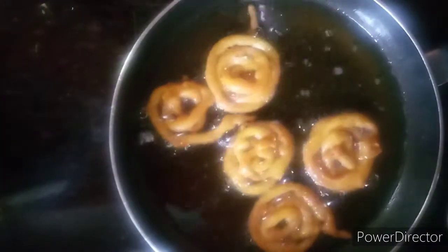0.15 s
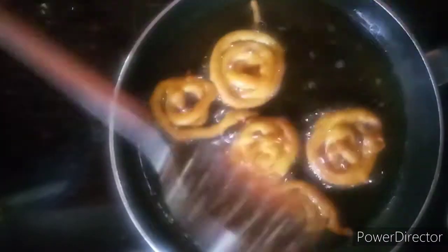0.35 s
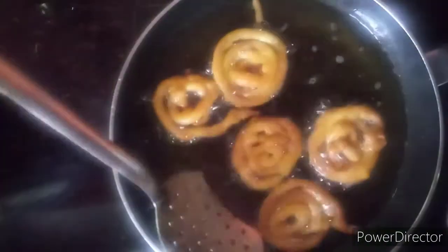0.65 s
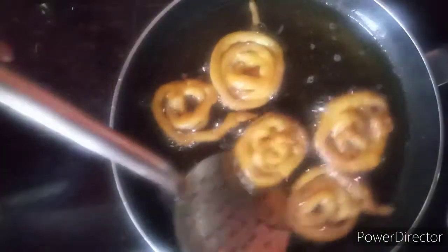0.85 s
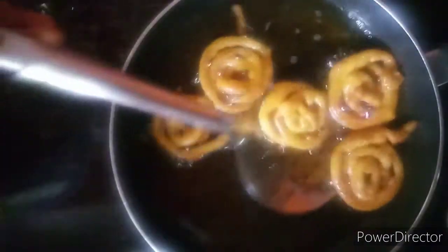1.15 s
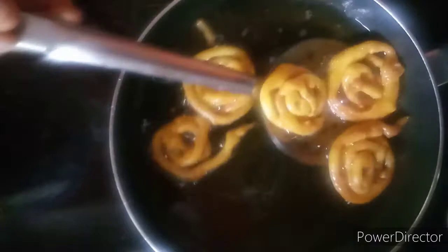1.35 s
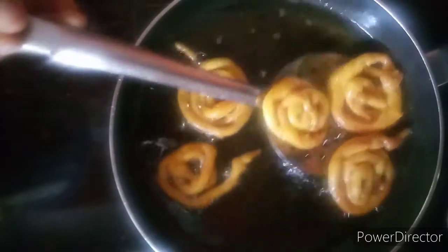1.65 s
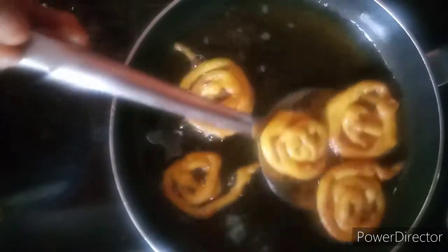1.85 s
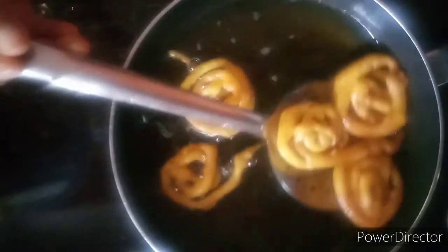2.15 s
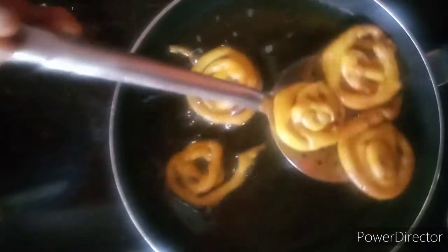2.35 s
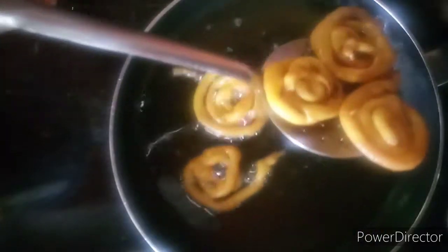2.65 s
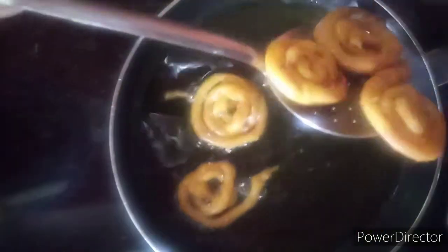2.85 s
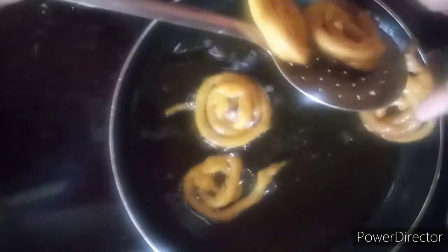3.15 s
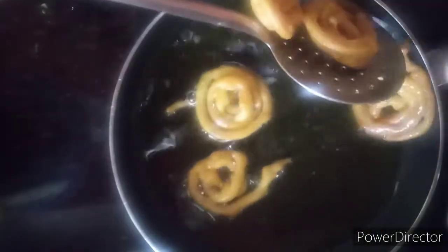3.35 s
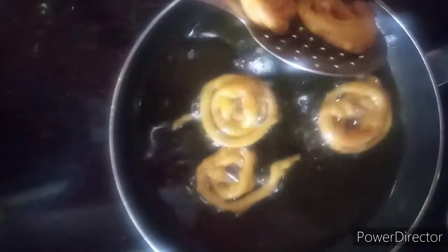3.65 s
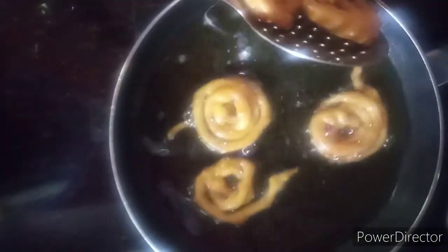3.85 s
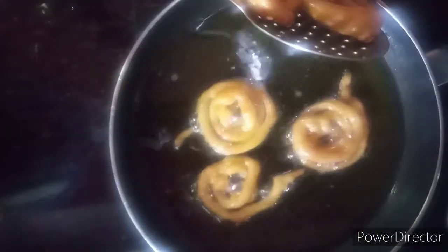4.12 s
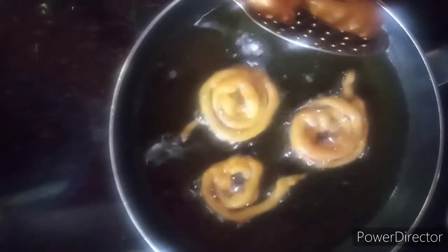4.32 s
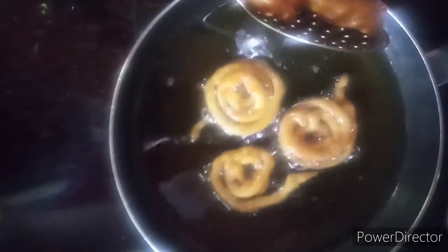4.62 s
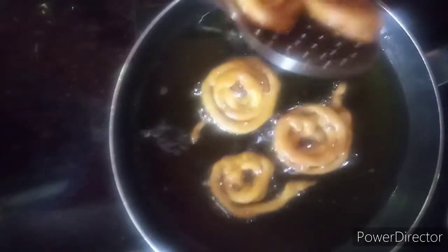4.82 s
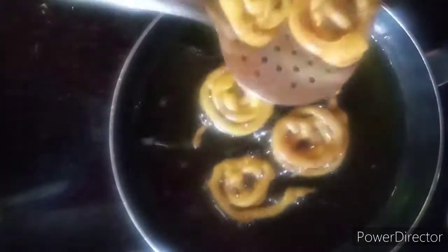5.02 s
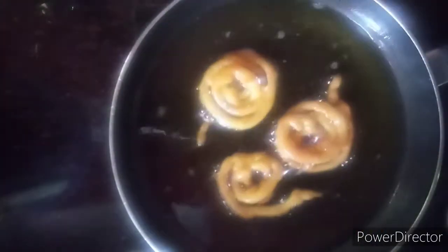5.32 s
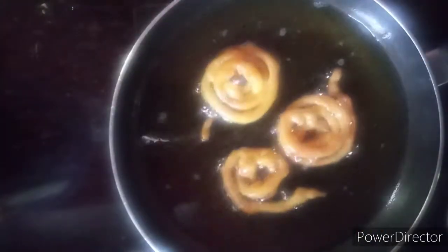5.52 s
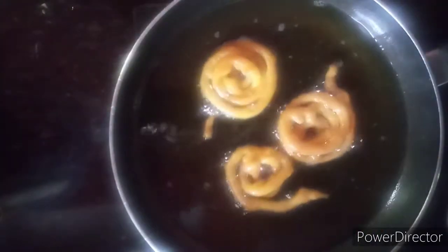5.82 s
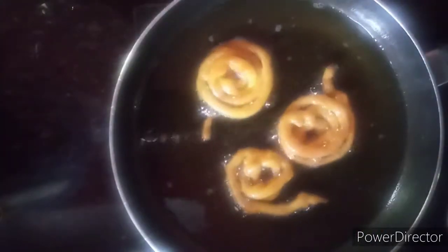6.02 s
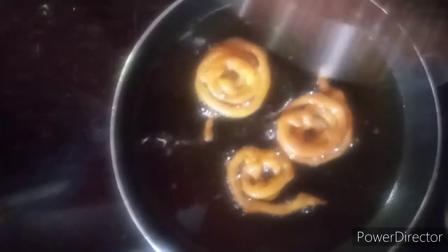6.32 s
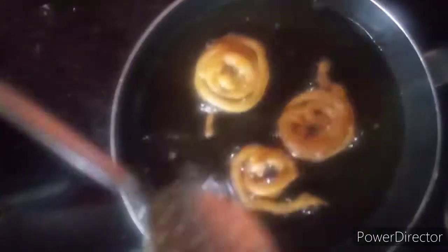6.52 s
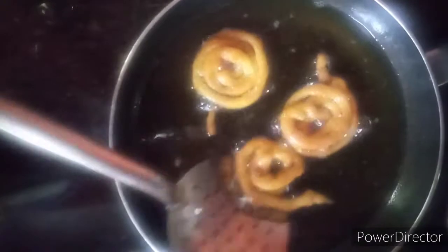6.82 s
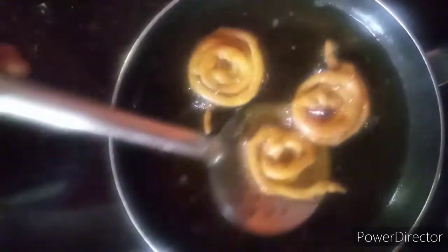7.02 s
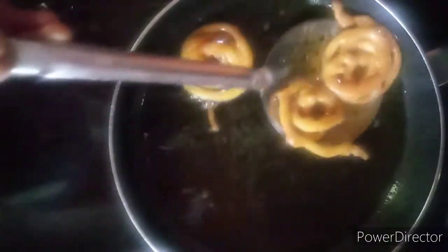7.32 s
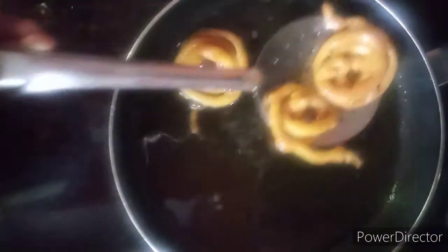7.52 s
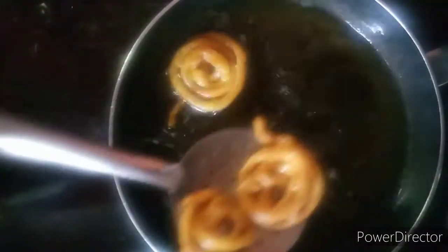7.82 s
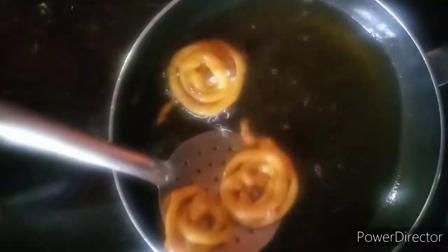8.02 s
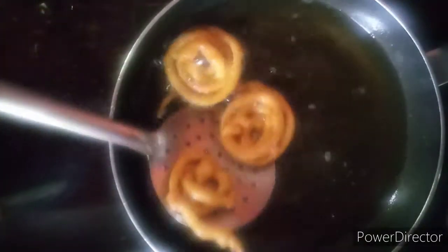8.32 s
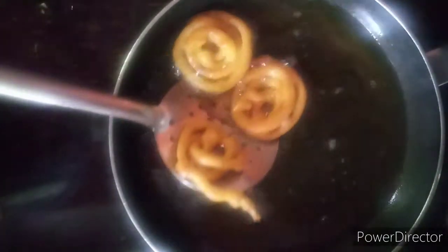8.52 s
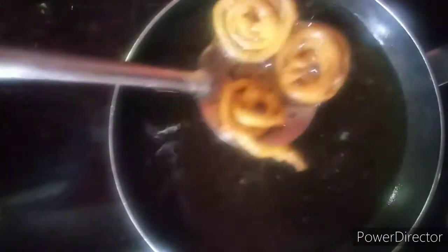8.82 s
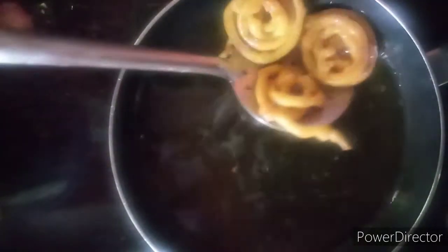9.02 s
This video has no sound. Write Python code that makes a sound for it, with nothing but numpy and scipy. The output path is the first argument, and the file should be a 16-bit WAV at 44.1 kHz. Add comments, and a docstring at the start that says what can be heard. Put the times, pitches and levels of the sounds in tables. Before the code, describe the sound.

A metal skimmer knocks and scrapes in a pan of quietly sizzling oil and clatters once against a metal dish.

```python
"""Frying batter, close to the stove

Batter spirals sizzle quietly in oil as tiny steam bubbles burst, in a small hard-walled kitchen.
Near the microphone a steel skimmer knocks against the oil-damped pan and drags over its bottom.
Past halfway it is unloaded beside the stove: it judders over a metal dish, which clatters, and then
returns to the pan. Underneath lie the flutter of the burner, a mains hum and a faint hiss."""
import sys
import numpy as np
from scipy import signal
from scipy.fft import rfft, irfft, next_fast_len
from scipy.io import wavfile

SR = 44100
rng = np.random.default_rng(int(sys.argv[2]) if len(sys.argv) > 2 else 0)


def inscribe(sig):
    """Save sig as 16-bit PCM at rate SR to the path in sys.argv[1].

    A 1-D sig is mono; a 2-D sig holds one channel per row.
    Samples are clipped to [-1, 1] before scaling.
    """
    pcm = np.round(np.clip(np.atleast_2d(sig).T, -1, 1) * 32767)
    wavfile.write(sys.argv[1], SR, pcm.astype(np.int16))


N = 403956
TIME = np.arange(N) / SR
RING_TIME = TIME[:SR]

# skimmer on pan: (time [s], level [dB], thump, ring, tick [dB re level], rocking pitch [Hz])
KNOCKS = [(0.712, -30.5, -17.5, -19, -38, 300), (2.211, -40.5, -19, -13, -31, 514),
          (3.168, -30.5, -9.5, -14.5, -20, 303), (3.39, -39.5, -15, -17, -28, 290),
          (3.613, -36, -16.5, -11, -45, 295), (5.063, -37.5, -12.5, -8, -32, 310),
          (5.103, -45, -17, -20, -20, 310), (6.779, -30, -13.5, -13.5, -30, 293),
          (6.86, -37.5, -13, -15.5, -38, 284), (7.842, -34, -6.5, -5.5, -17.5, 443),
          (8.149, -28.5, -16.5, -15, -35, 285), (8.273, -26, -16, -17, -37, 306),
          (8.519, -36, -21, -14.5, -43, 452), (8.959, -39.5, -20, -13, -28.5, 446),
          (9.016, -40, -16, -10.5, -35, 437)]
# resonances of the oiled pan: (frequency [Hz], level [dB], t60 [s])
PAN_MODES = [(296.2, -5, 0.3), (368, 0.5, 0.14), (470, -8.5, 0.15), (609, 1.5, 0.14), (703, -4.5, 0.16),
             (856, 0, 0.13), (962, 8, 0.037), (1060, -2.5, 0.15), (1433, -10.5, 0.2), (1765, -23, 0.27),
             (2070, -10, 0.12), (2320, -8, 0.091), (2724, -15, 0.12), (2630, -41, 0.2), (2860, -24, 0.28)]
# the crowd of quickly damped modes between them: (frequency [Hz], level [dB])
PAN_WASH = [(150, -6.5), (300, -10), (600, 3.5), (1050, 4.5), (1300, -8), (1650, -11), (2100, -6),
            (2750, -7), (3100, -14.5), (3600, -25), (4800, -16.5), (8000, -22.5), (10000, -24),
            (15000, -23)]
# the pan's thump, clank, ring and tick registers: (low edge [Hz], high edge [Hz], level [dB])
PAN_REGISTERS = [(168, 514, -10), (573, 1990, -17.5), (1533, 3000, -8), (3920, 9200, -10.5)]


def pan_knocks():
    """The skimmer strikes the pan, and its springy handle drops it back once, softly."""
    # change on the rebound: (level [dB], thump [dB], ring [dB], tick [dB])
    rebound_db = [-15, -4, -5, -4]
    hits = rebounding(KNOCKS, rebound_db, delay_s=0.022)
    return blows(hits, struck_pan, rock_db=-7.5, rock_t60=0.093, rock_rise_s=0.0017)


def struck_pan():
    """Oil damps most of the pan's modes within a few hundredths of a second."""
    return touch(PAN_MODES, PAN_WASH, PAN_REGISTERS,
                 wash_db=8.5, wash_t60=0.046, uneven_db=2.5, contact_s=0.00048, crack_db=-5.5)


def pan_nudges():
    """The skimmer pushes the pan softly, cushioned by oil and batter."""
    # (time [s], level [dB], thump [dB re level])
    nudges = [(1.257, -48, -19), (1.569, -54, 1.5), (1.64, -51, -2.5), (2.273, -46.5, -10.5),
              (2.839, -52.5, -3), (3.135, -40.5, -15), (3.349, -39.5, -6), (5.078, -43.5, -10),
              (6.957, -46, -17), (7.491, -46.5, -5), (7.688, -57, -1.5), (8.128, -45, -22),
              (8.254, -47, -16)]
    ring_db, tick_db, rock_hz = -13, -25, 294.5
    pushes = [(*row, ring_db, tick_db, rock_hz) for row in nudges]
    return blows(pushes, nudged_pan, rock_db=-6.5, rock_t60=0.099, rock_rise_s=0.0075)


def nudged_pan():
    """A cushioned push swells slowly and rubs on for a moment."""
    return touch(PAN_MODES, PAN_WASH, PAN_REGISTERS,
                 wash_db=1.5, wash_t60=0.16, uneven_db=0, contact_s=0.0056, crack_db=-15)


def dish_clatter():
    """The skimmer lands on the dish, bounces, and judders on its handle in even, glancing touches."""
    # landings: (time [s], level [dB], thump, ring, tick [dB re level])
    clanks = [(0.075, -44, -5, -6.5, -46), (5.748, -23.5, -17, -13, -23.5), (5.797, -27, -14, -8.5, -31),
              (5.959, -30, -13.5, -15, -27), (6.005, -23, -8.5, -6, -29.5), (6.024, -22, -4, -3.5, -28.5),
              (6.113, -34.5, -3, -3, -26), (6.162, -42.5, 0.5, -1.5, -25)]
    # change on the dry dish's quick, hard rebound: (level [dB], thump [dB], ring [dB], tick [dB])
    rebound_db = [-7, -7, 6, -7]
    # runs of touches: (time [s], length [s], first level [dB], slope [dB/s])
    judders = [(0.001, 0.13, -42, 11), (5.773, 0.115, -19.5, -150), (5.97, 0.04, -20.5, -16)]
    # colour of a glancing touch: (thump, ring, tick [dB re level])
    glance_db = [-19, -15.5, -40]
    rock_hz, judder_gap_s = 726, 0.0245
    landings = rebounding([(*row, rock_hz) for row in clanks], rebound_db, delay_s=0.0076)
    glances = [(s + t, db + db_per_s * t, *glance_db, rock_hz)
               for s, length_s, db, db_per_s in judders for t in np.arange(0, length_s, judder_gap_s)]
    return blows([*landings, *glances], struck_dish, rock_db=-11.5, rock_t60=0.043, rock_rise_s=0.0019)


def struck_dish():
    """The dry metal dish rings more freely than the pan."""
    # resonances: (frequency [Hz], level [dB], t60 [s])
    modes = [(428.5, -24, 0.23), (588.5, -5.5, 0.35), (648, -4, 0.5), (717, -13, 0.35), (831, -12.5, 0.65),
             (950, -21, .4), (1050, -10, 0.2), (1155, 15.5, 0.061), (1200, 11.5, 0.074), (1259, 6, 0.28),
             (1273, -11, 0.46), (2350, -1, 0.18), (2320, -1, 0.13), (2342, -15, 0.14), (2750, -5.5, 0.13),
             (3150, -19, 0.083), (3560, -19, 0.15)]
    # quickly damped modes between them: (frequency [Hz], level [dB])
    wash = [(200, -6.5), (420, -1), (750, 6), (1250, 1.5), (1500, -10), (1900, -11.5), (2400, 0),
            (3200, -9), (3800, -21.5), (5000, -7.5), (8300, -7), (9500, -15), (15000, -16)]
    # thump, clank, ring and tick: (low edge [Hz], high edge [Hz], level [dB])
    registers = [(258, 994, -9.5), (954, 1540, -16.5), (1445, 3460, -9.5), (4100, 14300, -11)]
    return touch(modes, wash, registers,
                 wash_db=4, wash_t60=0.074, uneven_db=-0.6, contact_s=0.001, crack_db=-10)


def touch(modes, wash, registers, wash_db, wash_t60, uneven_db, contact_s, crack_db):
    """One touch on a metal vessel, split into registers; each contact point weights the modes anew."""
    weights = from_db(uneven_db * rng.standard_normal(len(modes))) * rng.choice([-1, 1], len(modes))
    tones = sum(w * from_db(db) * mode(hz, t60) for w, (hz, db, t60) in zip(weights, modes))
    crowd = coloured(rng.standard_normal(SR), wash) * dying(wash_t60)
    body = (unit_attack(tones) + from_db(wash_db) * unit_attack(crowd)) * rising(contact_s)
    # steel meeting steel gives off a dry, bright crack before the body takes over
    crack = band(coloured(rng.standard_normal(SR), wash), low_hz=4100, high_hz=14900) * dying(t60=0.015)
    whole = unit_attack(body) + from_db(crack_db) * unit_attack(crack)
    return np.array([from_db(db) * unit_attack(band(whole, low, high)) for low, high, db in registers])


def blows(rows, vessel, rock_db, rock_t60, rock_rise_s):
    """Each blow rings the vessel and rocks it on its support."""
    out = np.zeros(N)
    for s, level_db, thump_db, ring_db, tick_db, rock_hz in rows:
        body = from_db([thump_db, 0, ring_db, tick_db]) @ vessel()
        rock = from_db(thump_db + rock_db) * unit_attack(mode(rock_hz, rock_t60) * rising(rock_rise_s))
        add(out, s, from_db(level_db) * (body + rock))
    return out


def rebounding(rows, change_db, delay_s):
    """Every blow, and the weaker one that follows it."""
    return np.vstack([rows, np.array(rows) + [delay_s, *change_db, 0]])


def skimmer_tings():
    """Edge-on hits set the skimmer itself ringing; the point of contact picks which modes speak."""
    # (time [s], level [dB], most excited frequency [Hz], spread [octaves])
    hits = [(0.713, -58.5, 1820, 0.2), (3.169, -43, 1063, 0.2), (3.391, -54, 1063, 0.2),
            (5.064, -52.5, 2560, 0.2), (5.103, -61, 6500, 0.06), (5.746, -50, 7400, 0.33),
            (6.023, -29, 3760, 0.41), (6.781, -46, 3600, 0.75)]
    # disc and handle: (frequency [Hz], level [dB], t60 [s])
    modes = [(1062, 2.5, 0.13), (1827, -0.5, 0.34), (2550, 1, 0.18), (3430, -19, 0.11), (4430, -22.5, 0.14),
             (5660, -6.5, 0.073), (6180, -7, 0.11), (6330, -2.5, 0.13), (7260, -5.5, 0.12),
             (8200, 3, 0.033)]
    out = np.zeros(N)
    for s, level_db, centre_hz, octaves in hits:
        for hz, db, t60 in modes:
            share = np.exp(-(np.log2(hz / centre_hz) / octaves) ** 2)
            add(out, s, share * from_db(level_db + db) * mode(hz, t60))
    return out


def pan_drags():
    """A light stroke slides dully on the oil; a firm one bites the metal and grates."""
    # strokes over the pan bottom: (time [s], length [s], final pressure [dB])
    drags = [(0.829, 0.16, -58), (1.27, 0.081, -59.5), (1.881, 0.22, -62.5), (7.313, 0.086, -60),
             (8.373, 0.185, -50.5), (8.705, 0.261, -51)]
    # what a firm and a light stroke excite most: (frequency [Hz], level [dB], t60 [s])
    grate_modes = [(297, -10, 0.12), (449.4, -10.5, 0.15), (598, -22, 0.096), (710, -9, 0.15),
                   (974, 5.5, 0.032), (1068, 2, 0.066), (1373, -14, 0.053), (2490, -13, 0.16),
                   (2630, -11, 0.067)]
    slide_modes = [(347, -4, 0.056), (484, -3.5, 0.059), (635, -4.5, 0.13), (895, -10, 0.039),
                   (1012, -12.5, 0.067)]
    # their colours: (thump [dB], clank [dB], ring [dB], tick [dB])
    grate_db = [-9, 6.5, -14, -26.5]
    slide_db = [-2.5, 5.5, -3.5, -34]
    bite_db = -49.5   # pressure at which the rim breaks through the oil film
    pressure = sum(stroke(*row) for row in drags)
    bite = np.clip(pressure / from_db(bite_db), 0, 1)
    grate = rubbing(pressure * bite, grate_modes, grate_db)
    slide = rubbing(pressure * np.sqrt(1 - bite ** 2), slide_modes, slide_db)
    return grate + from_db(-6.5) * slide


def rubbing(force, modes, colour_db):
    """Hundreds of tiny catches a second, under an unsteady hand, ring the pan."""
    catches = rms_one(grains(per_s=900, spread_db=2) * from_db(3.8 * drift(50)))
    registers = touch(modes, PAN_WASH, PAN_REGISTERS,
                      wash_db=-6.5, wash_t60=0.031, uneven_db=-1.5, contact_s=0.00028, crack_db=-8.5)
    ring = from_db(colour_db) @ registers
    return signal.fftconvolve(catches * force, ring / np.linalg.norm(ring))[:N]


def stroke(s, length_s, db):
    """A rubbing stroke takes hold, presses harder as it goes, then lets go."""
    attack_s, swell_db, release_s = 0.012, 3, 0.065
    along = np.clip((TIME - s) / length_s, 0, 1)
    attack = np.clip((TIME - s) / attack_s, 0, 1)
    release = np.clip(1 - (TIME - s - length_s) / release_s, 0, 1)
    return attack * release * from_db(db + swell_db * (along - 1))


def rim_squeaks():
    """The skimmer slides lightly on the rim and feeds a single resonance."""
    # (time [s], length [s], final level [dB], pitch [Hz])
    squeaks = [(0.34, 0.34, -73.5, 845), (4.596, 0.13, -75, 772)]
    out = np.zeros(N)
    for s, length_s, db, hz in squeaks:
        tone = signal.fftconvolve(rng.standard_normal(N), mode(hz, t60=0.087))[:N]
        out += stroke(s, length_s, db) * rms_one(tone)
    return out


def worktop_boom():
    """The worktop booms as weight shifts on it and as knocks pass down through the stove's feet."""
    # shifts of weight: (time [s], level [dB])
    thuds = [(1.27, -60), (5.753, -47), (6.03, -57), (6.56, -71)]
    boom_db, at_knock_db, db_per_db = -61, -31, 0.42
    passed_down = [(s, boom_db + db_per_db * (db - at_knock_db)) for s, db, *_ in KNOCKS]
    out = np.zeros(N)
    for s, db in [*thuds, *passed_down]:
        add(out, s, from_db(db) * mode(hz=75, t60=0.68) * rising(contact_s=0.0049))
    return out


def sizzle():
    """Steam bubbles burst by the thousand, stirred by knocks; the coarse ones fade as the batter dries."""
    # bursting bubbles: (frequency [Hz], level [dB])
    spectrum = [(290, -43), (500, -7.5), (553, -30), (706, -24), (748, -0.5), (851, -3.5), (1030, -2),
                (1620, -9.5), (2650, 2), (3480, -20.5), (5200, -12), (8360, -12), (9790, -20.5),
                (12100, -13.5), (15500, -21)]
    # fine froth, before and after the skimmer returns: (time [s], relative level [dB])
    froth = [
        [(0.0, -74), (1.38, -74.5), (1.67, -76), (5.7, -76)],
        [(6.5, -79.5), (7.51, -78.5), (8.07, -76), (9.16, -79.5)],
    ]
    split_hz, fade_db_per_s, surge_db = 3600, 1.32, 2
    stir_db, stir_s = 1, 0.39
    fizz = coloured(grains(per_s=6000, spread_db=2.5), spectrum)
    coarse = signal.sosfilt(signal.butter(2, split_hz, fs=SR, output="sos"), fizz)
    fine = signal.sosfilt(signal.butter(2, split_hz, "high", fs=SR, output="sos"), fizz)
    stirred = np.max([(TIME > s) * np.exp(-np.abs(TIME - s) / stir_s) for s, *_ in KNOCKS], axis=0)
    coarse_db = -65.5 - fade_db_per_s * TIME + surge_db * drift(12)
    fine_db = np.interp(TIME, *np.vstack(froth).T) + 5 + 0.44 * drift(23)
    return from_db(stir_db * stirred) * (coarse * from_db(coarse_db) - fine * from_db(fine_db))


def burner():
    """The burner flutters low under the pan."""
    # (frequency [Hz], level [dB])
    spectrum = [(20, -18), (45, -8), (72, -1), (100, 1), (150, -6), (250, -11.5), (400, -15.5),
                (800, -21.5), (1500, -42.5)]
    return from_db(-70 + 0.22 * drift(6.2)) * coloured(rng.standard_normal(N), spectrum)


def mains_hum(hz=119.4):
    """A mains hum wavers slightly in phase and level."""
    tone = np.sqrt(2) * np.sin(2 * np.pi * hz * TIME + 0.39 * drift(5))
    return from_db(-68.5 + 2 * drift(13)) * tone


def stereo_hiss():
    """A faint, bright hiss, independent left and right."""
    # (frequency [Hz], level [dB])
    spectrum = [(2500, -21), (4000, -7.5), (6000, -4.5), (15000, -3)]
    return from_db(-78) * np.array([coloured(noise, spectrum) for noise in rng.standard_normal((2, N))])


def kitchen(x, wet_db, build_s):
    """The direct sound reaches the microphone first, then the duller, diffuse echo of the hard walls."""
    # (frequency [Hz], level [dB])
    walls = [(100, 2.5), (1000, -2), (3000, 0), (6000, -2), (14000, -2.5)]
    build_up = 1 - np.exp(-(RING_TIME / build_s) ** 2)
    tail = coloured(rng.standard_normal(SR), walls) * dying(t60=0.57) * build_up
    return x + from_db(wet_db) * signal.fftconvolve(x, tail / np.linalg.norm(tail))[:N]


def mode(hz, t60):
    """One struck resonance."""
    return np.sin(2 * np.pi * hz * RING_TIME) * dying(t60)


def rising(contact_s):
    """A vibration builds up for as long as the contact pushes."""
    return 1 - np.exp(-RING_TIME / contact_s)


def dying(t60):
    """Envelope of a free decay."""
    return from_db(-60 * RING_TIME / t60)


def grains(per_s, spread_db):
    """Random clicks of uneven size and sign."""
    sizes = from_db(spread_db * np.minimum(rng.exponential(1, N), 5))
    return sizes * rng.choice([-1, 1], N) * (rng.random(N) < per_s / SR)


def drift(per_s):
    """A random wander with a spread near 1."""
    knots = np.arange(0, TIME[-1] + 1, 1 / per_s)
    return np.interp(TIME, knots, rng.standard_normal(len(knots)))


def coloured(x, spectrum):
    """Shapes a noise by (frequency [Hz], level [dB]) points, at rms 1."""
    hz, db = np.transpose(spectrum)
    size = next_fast_len(len(x))
    bins = np.maximum(np.fft.rfftfreq(size, 1 / SR), 1)
    gain = from_db(np.interp(np.log(bins), np.log(np.sort(hz)), db))
    return rms_one(irfft(rfft(x, size) * gain, size)[:len(x)])


def band(x, low_hz, high_hz):
    """Causal band-pass."""
    return signal.sosfilt(signal.butter(4, [low_hz, high_hz], "band", fs=SR, output="sos"), x)


def unit_attack(x):
    """Scales a ring to rms 1 over its first 25 ms."""
    return x / np.sqrt(np.mean(x[:SR // 40] ** 2) + 1e-20)


def rms_one(x):
    return x / np.sqrt(np.mean(x ** 2) + 1e-20)


def from_db(db):
    return 10 ** (np.asarray(db) / 20)


def add(out, s, sound):
    """Mixes a sound in at time s."""
    at = int(np.clip(round(s * SR), 0, N - 1))
    out[at:at + len(sound)] += sound[:N - at]


def scene():
    """Pan and dish, close and centred, over the sizzle and the room tone; only the hiss has width."""
    pan = pan_knocks() + pan_nudges() + pan_drags() + rim_squeaks()
    clatter = dish_clatter() + skimmer_tings()
    near = kitchen(pan, wet_db=-2, build_s=0.005) + kitchen(clatter, wet_db=-5.5, build_s=0.013)
    return near + stereo_hiss() + worktop_boom() + sizzle() + burner() + mains_hum()


def record(dry):
    """The top is cut steeply."""
    cutoff_hz = 15600
    return signal.sosfilt(signal.ellip(10, .1, 70, cutoff_hz, fs=SR, output="sos"), dry)


dry = scene()
out = record(dry)
inscribe(out)
```